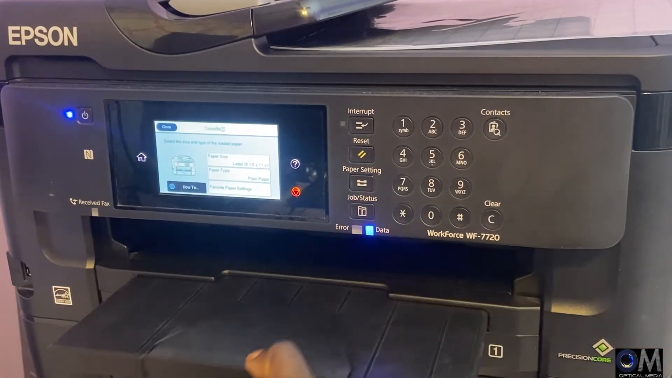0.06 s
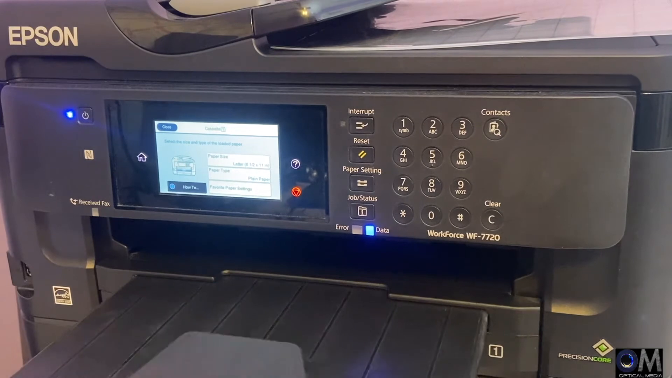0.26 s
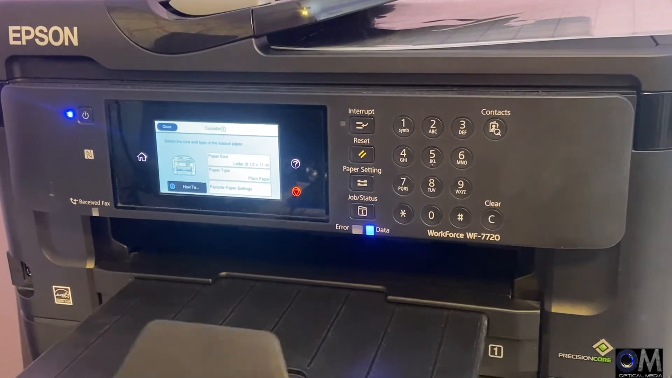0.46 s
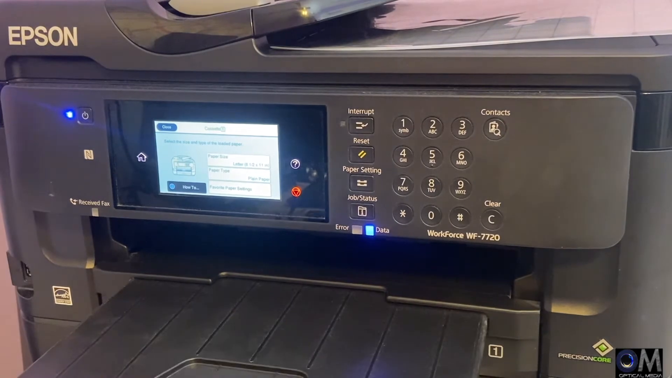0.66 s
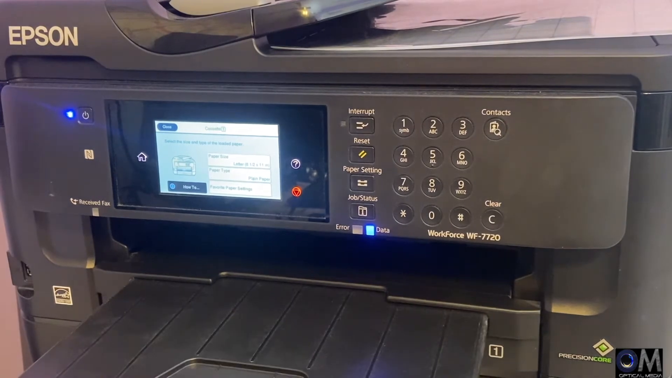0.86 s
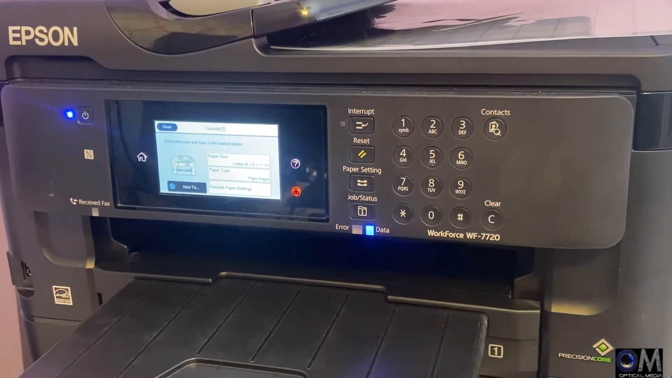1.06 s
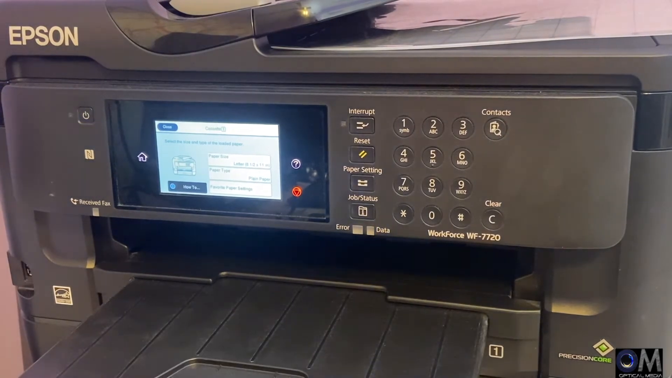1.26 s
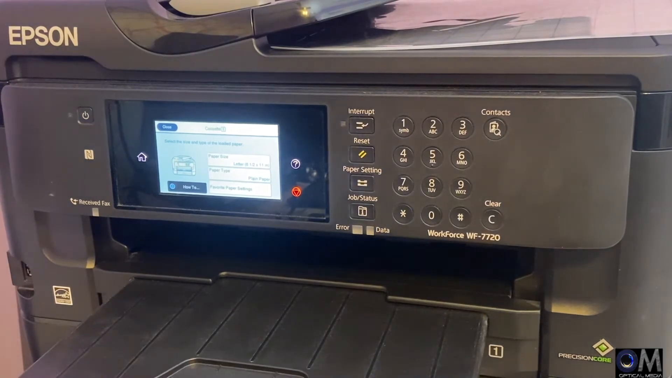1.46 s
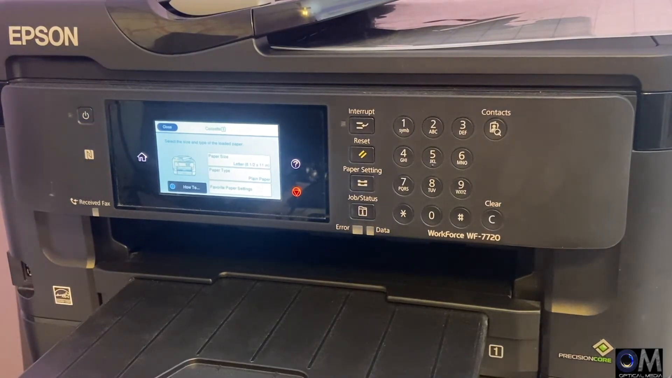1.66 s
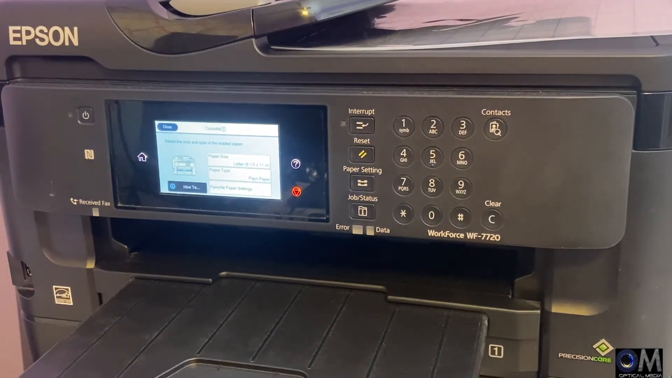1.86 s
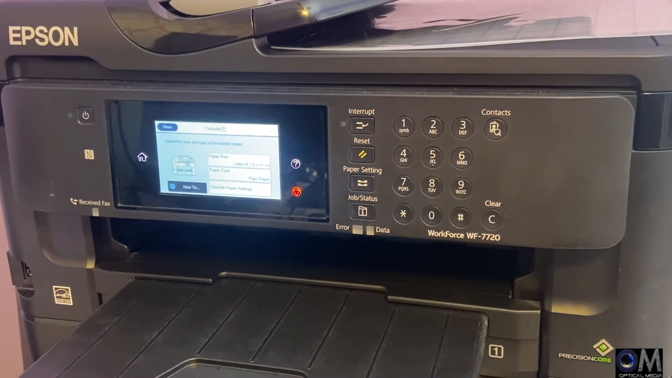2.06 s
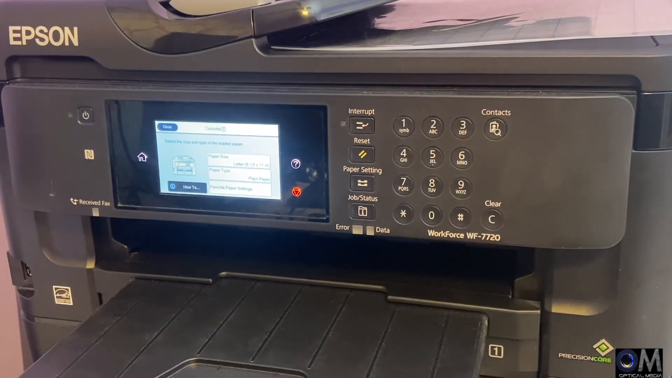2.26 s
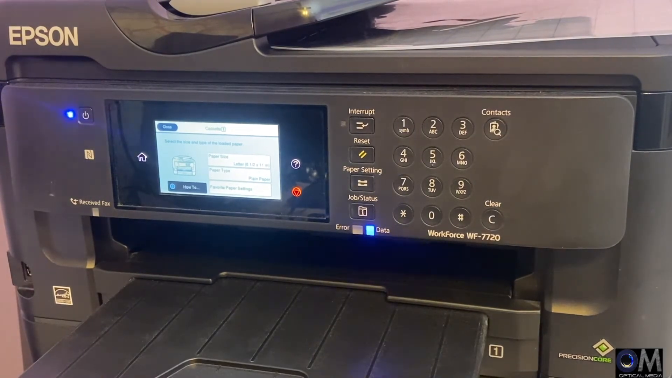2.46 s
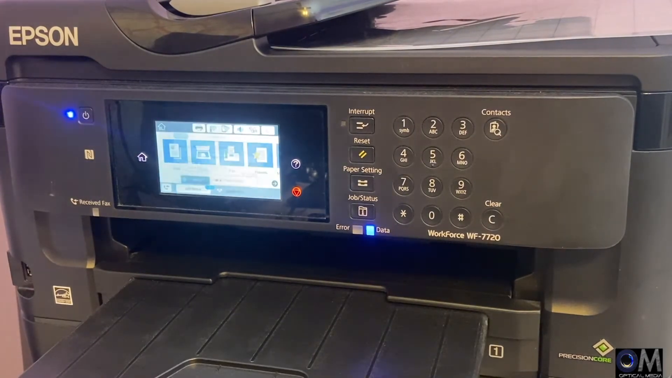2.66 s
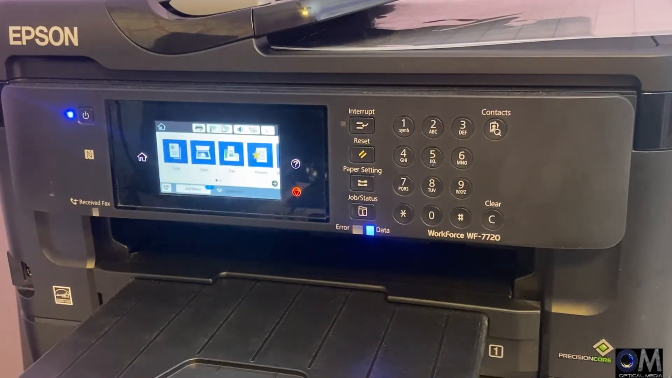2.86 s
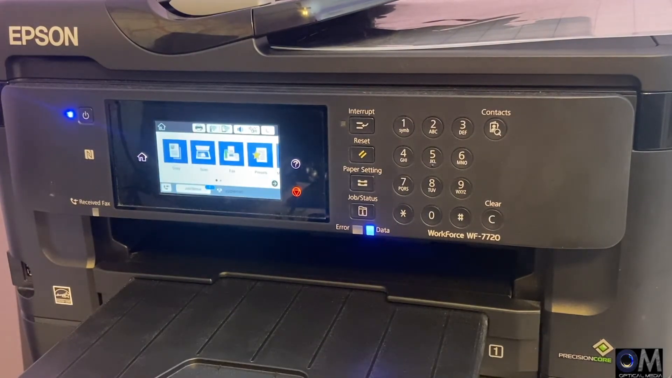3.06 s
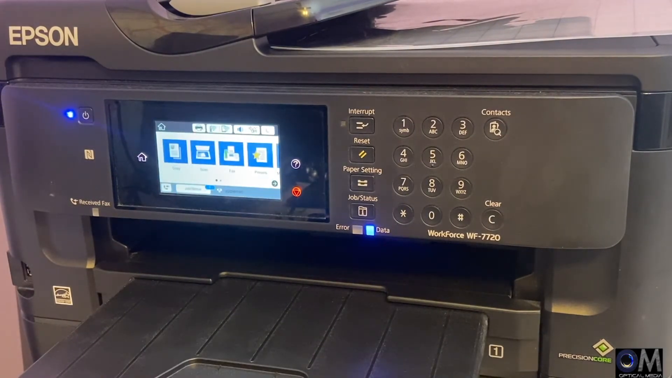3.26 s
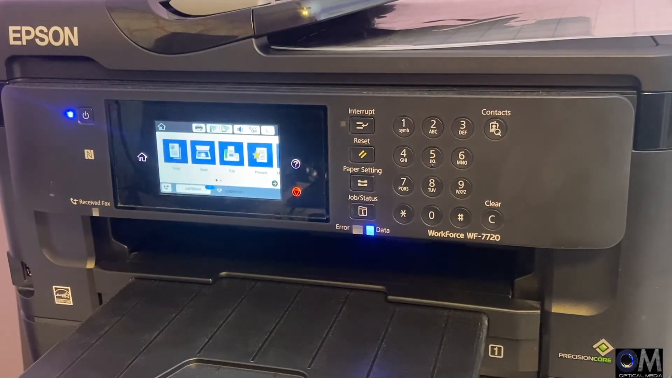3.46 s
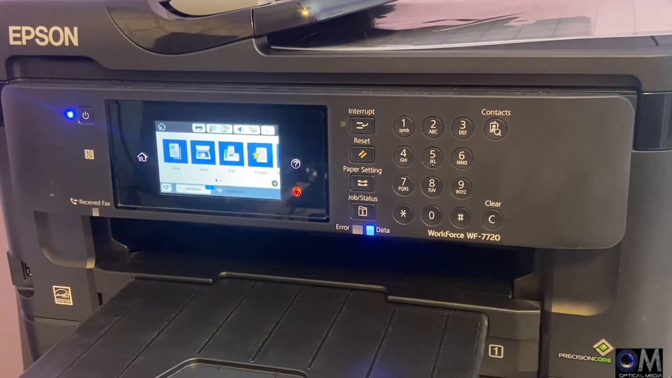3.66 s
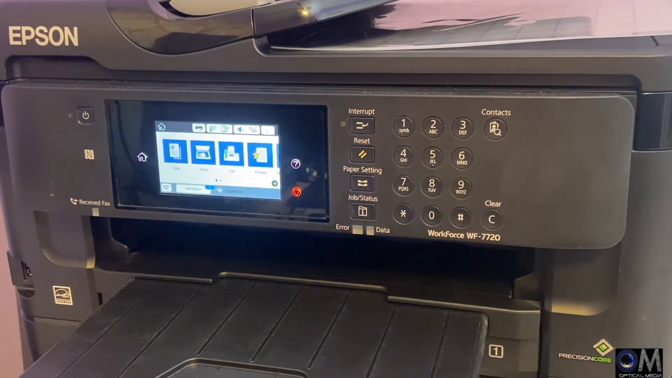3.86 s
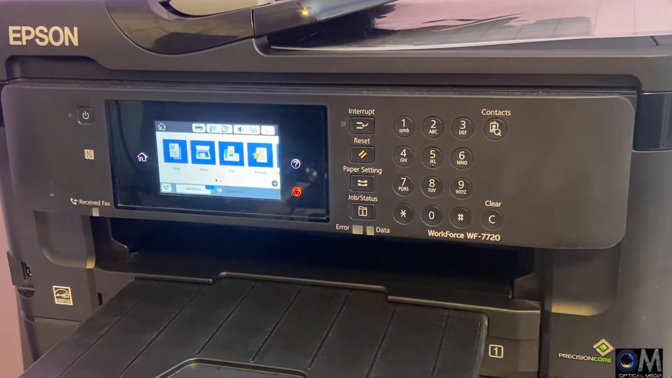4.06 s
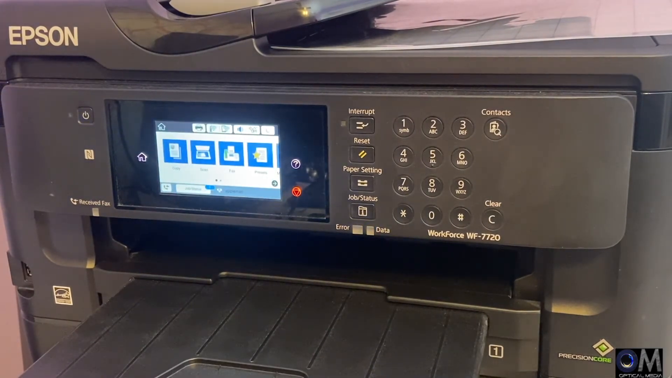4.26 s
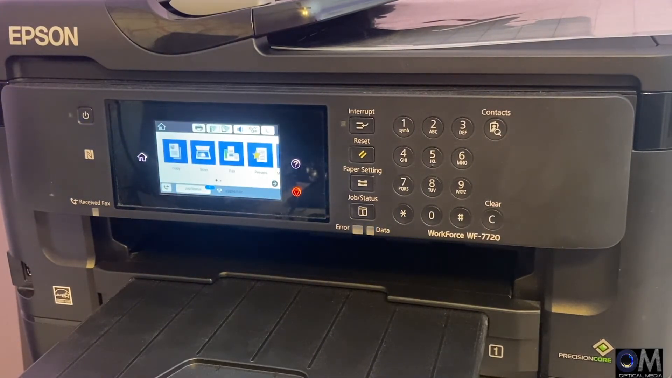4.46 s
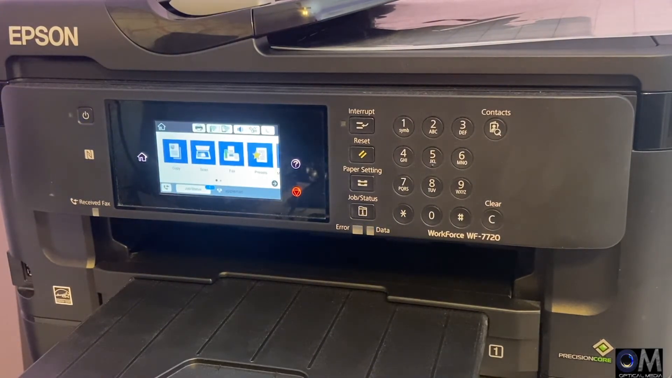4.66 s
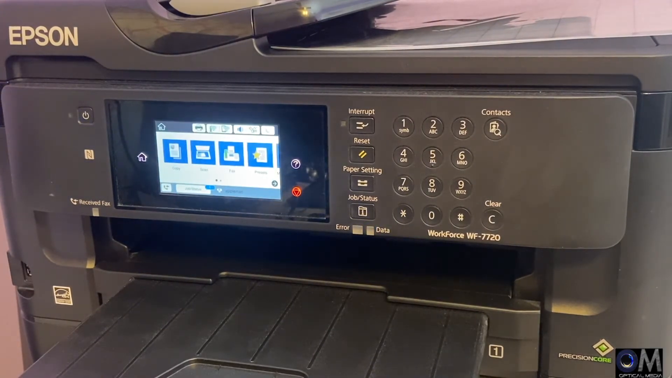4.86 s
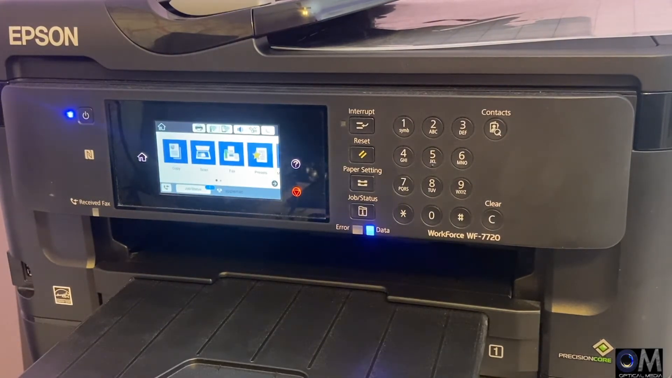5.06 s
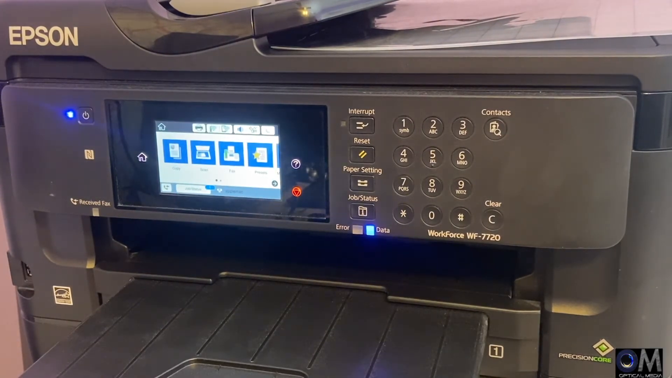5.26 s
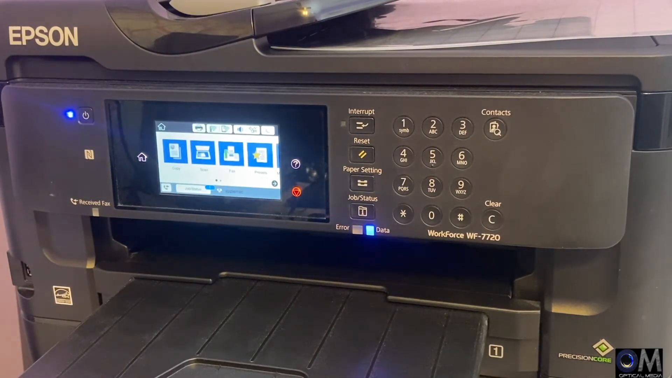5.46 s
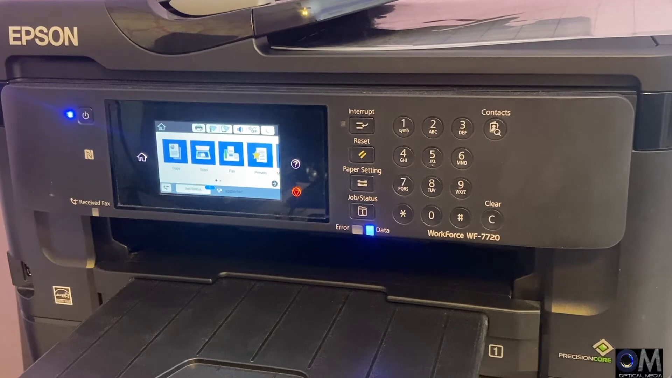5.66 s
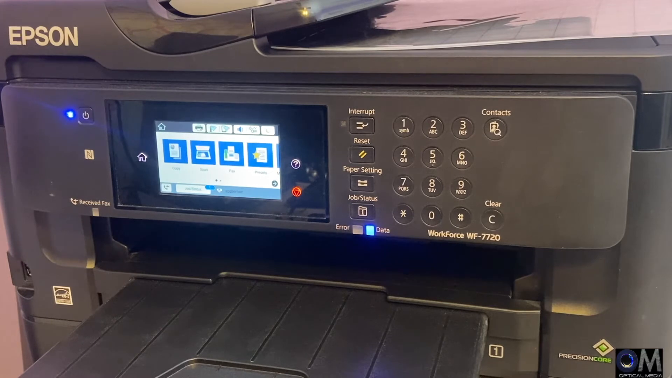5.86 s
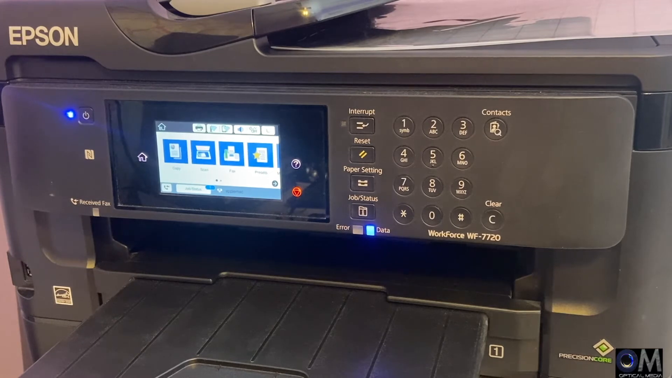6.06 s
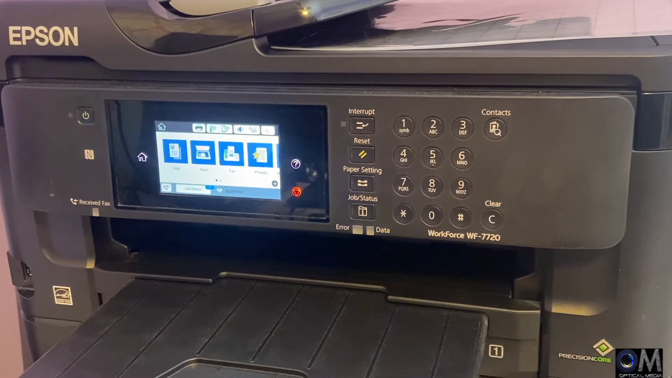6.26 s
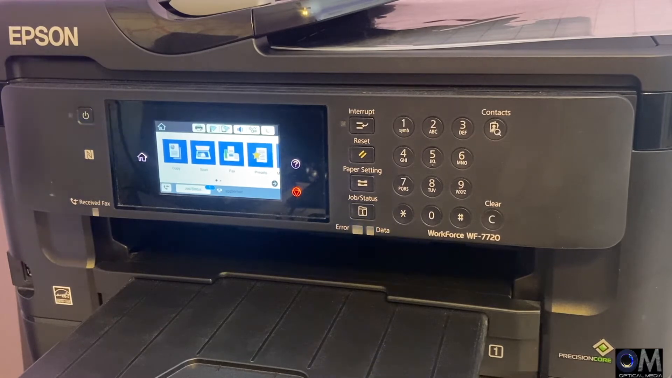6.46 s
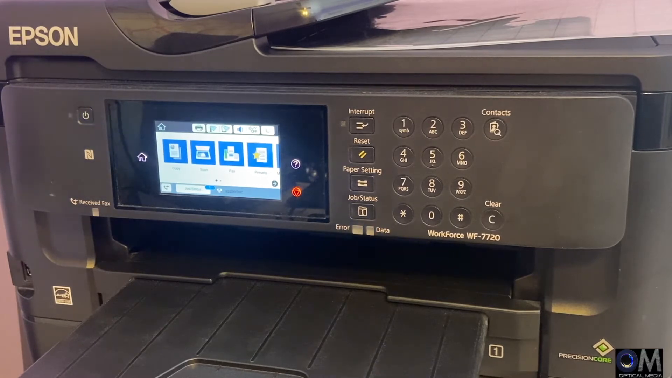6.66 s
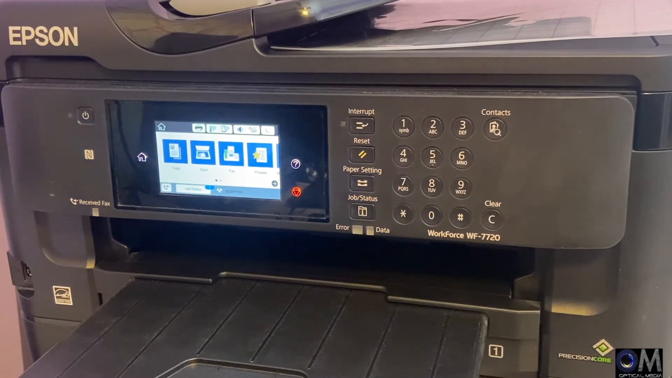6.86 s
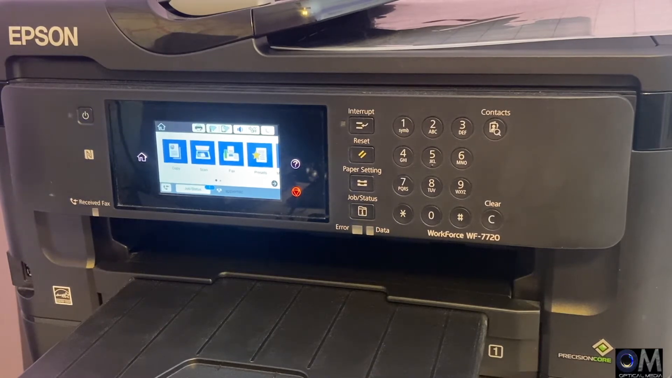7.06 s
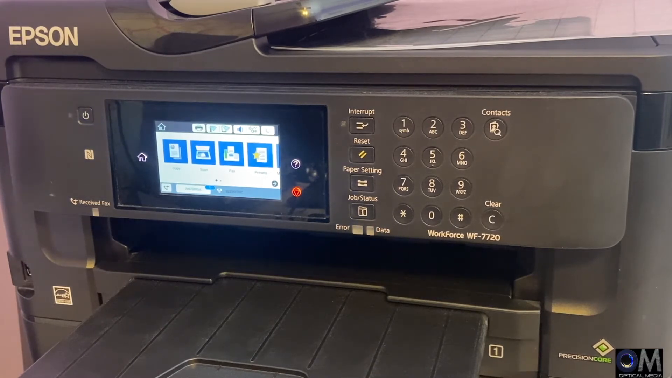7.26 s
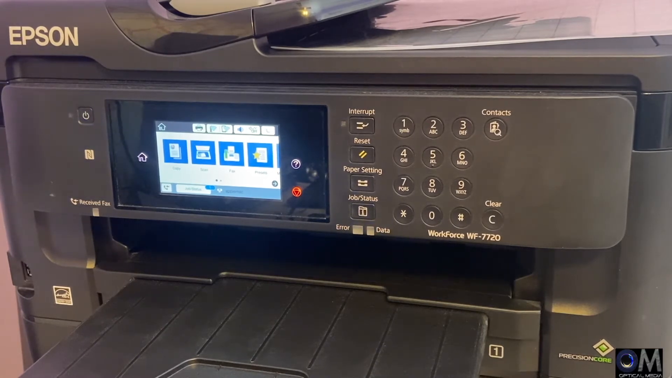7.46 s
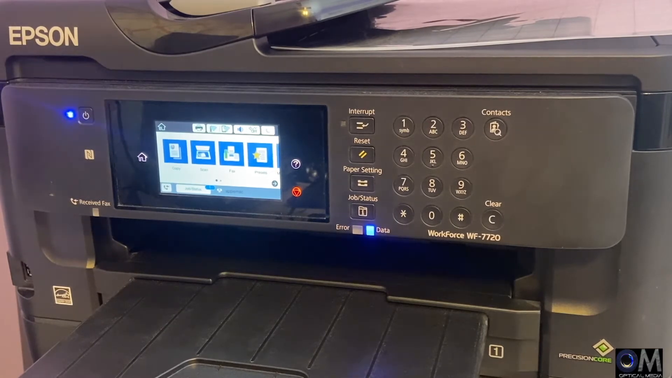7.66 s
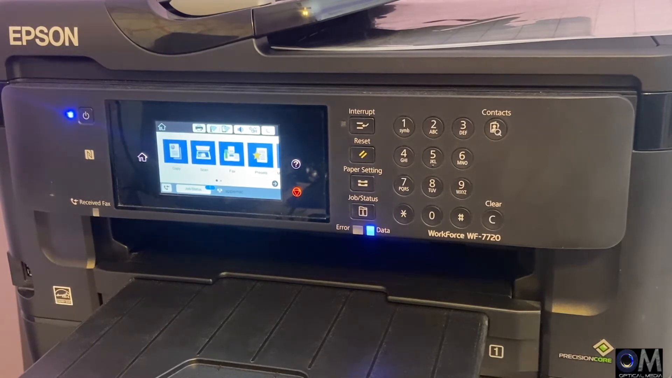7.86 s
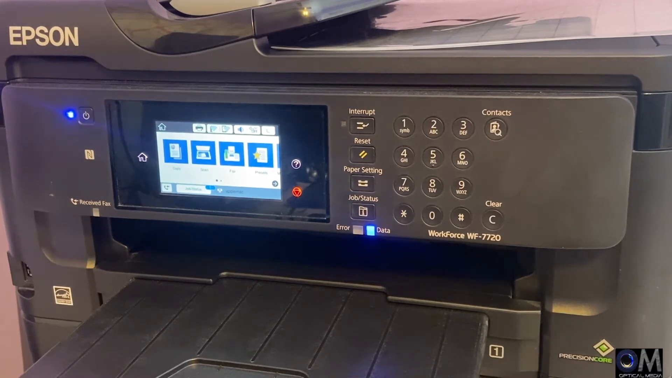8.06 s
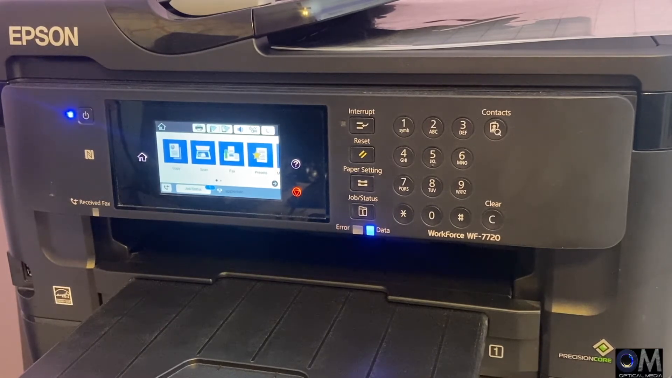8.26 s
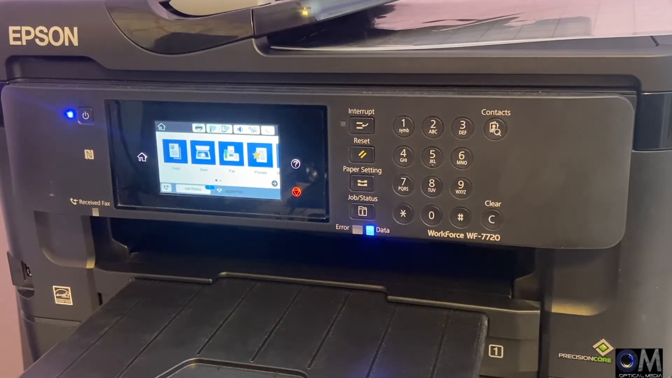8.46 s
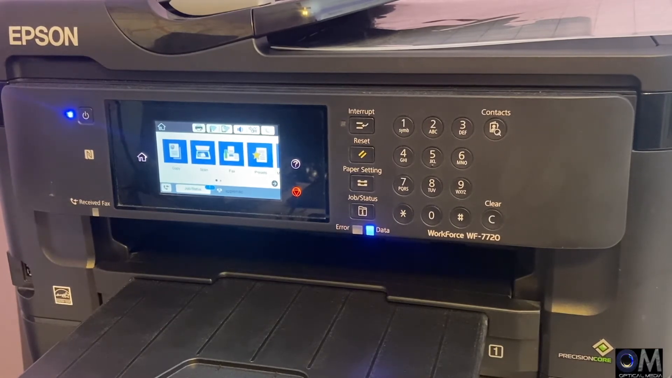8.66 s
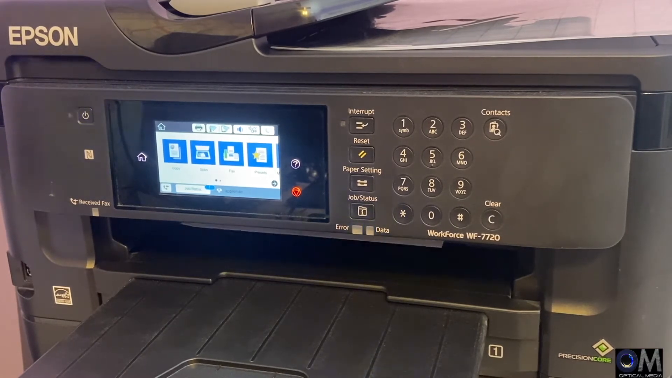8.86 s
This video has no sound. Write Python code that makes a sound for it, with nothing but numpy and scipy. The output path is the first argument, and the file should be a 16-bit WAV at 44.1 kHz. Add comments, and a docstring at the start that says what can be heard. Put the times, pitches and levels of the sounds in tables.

```python
"""In a small room, close to an inkjet printer. A hand slides out the plastic tray, which knocks against its end
stops, and ratchets up the paper stop. Latches click, and hard blows ring the low modes of the case. The drive
whirs through fast runs, its friction noise coloured by the panels, and a sheet is picked up with a sharp clack.
Then the carriage hums across three times a second, and between passes the rollers jerk the paper on with a gear
chirp. A fan, a mains hum and thin electronic whistles sound faintly underneath."""
import sys
import numpy as np
from scipy import signal
from scipy.fft import rfft, irfft, next_fast_len
from scipy.io import wavfile
from scipy.ndimage import uniform_filter1d

SR = 44100
rng = np.random.default_rng(int(sys.argv[2]) if len(sys.argv) > 2 else 0)


def pcm_store(signal):
    """Save signal as 16-bit PCM."""
    levels = np.round(np.clip(np.atleast_2d(signal), -1, 1) * 32767)
    wavfile.write(sys.argv[1], SR, levels.astype(np.int16).T)


N = 393372
T = np.arange(N) / SR

# resonances of the plastic panels: centre_hz, width_hz, lift_db
PANEL_RESONANCES = [(159, 23, 3.5), (182, 9.9, 4), (261.6, 19, 3), (423, 43, 4.5), (491, 41, 3),
                    (640, 31, 2.5), (866, 190, 4), (1007, 78, 4), (1034, 27, 2.5), (1190, 55, 4.5),
                    (1516, 60, 1.5), (1740, 53, 0.5), (2000, 80, 1.5), (2562, 125, 3), (3015, 297, 2.5),
                    (3359, 79, 3), (3830, 345, 1.5), (4740, 70, 4.5), (5900, 172, 1.5), (6299, 339, 2.5)]
# fast runs of the drive: full_speed_s, length_s, spin_up_s, gear_db, slide_db, whine_db, drone_db
DRIVE_RUNS = [(3.028, 0.25, 0.19, -37, -51.5, -44.5, -42), (3.377, 0.45, -0.2, -37, -51.5, -44, -39.5),
              (4.582, 0.48, 0.32, -37.5, -48.5, -44.5, -40), (5.121, 0.043, 0.14, -35.5, -51, -51, -39.5),
              (5.236, 0.073, .06, -36, -49.5, -45.5, -42.5)]
# paper advances: full_speed_s, gear_db, roller_db, paper_db
PAPER_ADVANCES = [(5.682, -50, -39.5, -57), (6.025, -42, -39.5, -52), (6.367, -47, -40.5, -46.5),
                  (6.704, -34, -39.5, -38.5), (7.031, -37.5, -39, -41), (7.363, -35, -38.5, -43.5),
                  (7.702, -40, -37.5, -41), (8.031, -40, -38, -44), (8.369, -38.5, -35, -44.5),
                  (8.695, -36, -40, -43)]
MEAN_GEAR_DB = np.mean([row[1] for row in PAPER_ADVANCES])
SPIN_DOWN_S = 0.047


def amp(db):
    """Decibels to amplitude ratio."""
    return 10 ** (np.asarray(db) / 20)


def rms_one(x):
    """Normalisation to unit rms."""
    return x / np.sqrt(np.mean(x ** 2) + 1e-20)


def at_hz(points, hz):
    """Interpolation on a log-frequency axis."""
    point_hz, value = np.transpose(points)
    return np.interp(np.log(np.maximum(hz, 1)), np.log(point_hz), value)


def drift(per_s):
    """Random modulation of unit spread, interpolated between per_s values a second."""
    knots = rng.standard_normal(8192)
    return np.interp(T * per_s, np.arange(len(knots)), knots) * np.sqrt(3 / 2)


def swell(s, length_s, attack_s, release_s):
    """Exponential rise to 1 at s, hold and decay; attack and release are times for 20 dB, at least 2 ms."""
    before = np.maximum(s - T, 0) / max(attack_s, .002)
    after = np.maximum(T - s - length_s, 0) / max(release_s, .002)
    return amp(-20 * np.minimum(before + after, 10))


def phase_of(hz):
    """Phase as the integral of frequency."""
    return 2 * np.pi * np.cumsum(hz) / SR


def sine(hz):
    """Frequency-modulated sinusoid of unit rms."""
    return np.sqrt(2) * np.sin(phase_of(hz))


def add(track, s, sound):
    """Superposition of a sound on a track, starting at s."""
    start = max(round(s * SR), 0)
    track[start:start + len(sound)] += sound[:N - start]


def lift_db(resonances, hz):
    """Resonance: a plastic part lifts its excitation in bell-shaped peaks."""
    return sum(db / (1 + (2 * (hz - centre) / width) ** 2) for centre, width, db in resonances)


def colour(x, spectrum, panels=True):
    """Source and filter: an excitation takes on a spectrum and, optionally, the panel peaks; unit rms."""
    size = next_fast_len(N)
    grid_hz = np.geomspace(10, SR / 2, num=3000)
    shape_db = at_hz(spectrum, grid_hz) + panels * lift_db(PANEL_RESONANCES, grid_hz)
    gain = np.interp(np.fft.rfftfreq(size, 1 / SR), grid_hz, amp(shape_db))
    return rms_one(irfft(rfft(x, size) * gain, size)[:N])


def friction(spectrum, per_s, grit):
    """Friction noise: smooth rubbing plus tiny random impacts, radiated by the panels."""
    impacts = (rng.random(N) < per_s / SR) * rng.uniform(-1.05, 1, N)
    return colour(rng.standard_normal(N) + grit * rms_one(impacts), spectrum)


def causal(x, gain):
    """Minimum-phase filtering: nothing sounds before the blow."""
    cepstrum = irfft(np.log(gain + 1e-9))
    cepstrum[1:len(x) // 2] *= 2
    cepstrum[len(x) // 2 + 1:] = 0
    return irfft(rfft(x) * np.exp(rfft(cepstrum)))


def struck(modes, t, spread_db):
    """Free vibration: damped modes start in alternate directions, with strengths that vary by blow."""
    return sum((-1) ** k * amp(db + spread_db * rng.normal() - 60 * t / t60) * np.sin(2 * np.pi * hz * t)
               for k, (hz, db, t60) in enumerate(modes))


def background(air_db=-58.5, steady_waver_hz=1.2, fade_s=.04):
    """Line spectra over a noise floor: fan, mains hum, printing hum and electronic whistles above low room
    noise."""
    # steady lines of the fan and of the mains hum: pitch_hz, level_db
    steady_lines = [(188.4, -71.5), (334.3, -62), (576, -76)]
    # a hum while printing, two whistles of the electronics: start_s, length_s, pitch_hz, level_db, waver_hz
    timed_lines = [(5.05, 3.9, 265, -58.5, 4), (0, 1.08, 12656, -78, 2), (2.7, 6.2, 13700, -83, 25)]
    # spectrum of the room noise: frequency_hz, density_db
    air_spectrum = [(15, -49.5), (30, -12), (46, 6.5), (90, -8), (130, 1.5), (200, -9.5), (300, -16),
                    (420, -19), (560, -16.5), (720, -31), (2500, -32.5), (7000, -46), (9500, -48),
                    (16000, -41)]

    def tone(hz, db, waver_hz):
        """A sinusoid with slight random modulation of pitch and level."""
        return amp(db + 1.5 * drift(12)) * sine(hz + waver_hz * drift(40))

    fan = sum(tone(hz, db, steady_waver_hz) for hz, db in steady_lines)
    tones = sum(swell(s, length, fade_s, fade_s) * tone(*line) for s, length, *line in timed_lines)
    mid, side = (colour(rng.standard_normal(N), air_spectrum, panels=False) for _ in range(2))
    return fan + tones + amp(air_db) * (mid + 0.1 * side * np.array([[1], [-1]]))


def murmurs(release_s=0.25):
    """Band-limited noise: a faint rumble at first, then two soft hisses as the printer wakes."""
    # noise bands: start_s, length_s, attack_s, centre_hz, width_hz, level_db
    bands = [(0, 1.08, .03, 160, 110, -54), (2.27, .08, .06, 3650, 600, -69),
             (2.3, 2.1, .35, 7100, 800, -84.5)]
    out = 0
    for s, length, attack_s, hz, width, db in bands:
        band = signal.butter(2, [max(hz - width / 2, 20), hz + width / 2], "band", fs=SR, output="sos")
        noise = rms_one(signal.sosfilt(band, rng.standard_normal(N)))
        out += amp(db) * swell(s, length, attack_s, release_s) * noise
    return out


def plastic_slides(scrape_db=-2.5, hiss_db=-1.5, attack_s=0.037, release_s=0.08):
    """Sliding friction of plastic on plastic: the tray comes out; later something shifts softly inside."""
    # sliding movements: start_s, length_s, scrape_db, hiss_db
    slides = [(-.04, 0.042, -39.5, -54), (0.004, 0.28, -45.5, -46.5), (0.839, 0.015, -57, -57),
              (1.214, 0.078, -67, -68.5), (1.435, 0.094, -47.5, -67.5)]
    # spectra of the low scrape and the bright hiss: frequency_hz, density_db
    scrape_spectrum = [(100, -4.5), (450, 3), (1200, -2.5), (2200, -7.5), (4000, -18), (12000, -40)]
    hiss_spectrum = [(800, -17.5), (2200, -2), (3600, -2.5), (5000, -6.5), (7000, -8), (10000, -11),
                     (16000, -18)]
    scrape, hiss = sum(amp(levels_db)[:, None] * swell(s, length, attack_s, release_s)
                       for s, length, *levels_db in slides)
    return (amp(scrape_db) * scrape * friction(scrape_spectrum, per_s=350, grit=0.35)
            + amp(hiss_db) * hiss * friction(hiss_spectrum, per_s=530, grit=0.71))


def knocks(contacts, resonances, part_db, crack_t60, ring_db, low_cut_hz, hard_rise_s=.0029, size=16384):
    """Impact on dense modes: a short crack and a ring of noise. part_db weights clack, body and tick."""
    # spectra of the clack, hollow body and bright tick of a knock: frequency_hz, density_db
    clack_spectrum = [(500, -19.5), (1300, 2), (1800, -0.5), (2500, 1.5), (3600, -3), (5000, -9.5),
                      (7000, -16.5), (12000, -39)]
    body_spectrum = [(50, -20.5), (130, -0.5), (300, -3.5), (600, 0.5), (1100, -3.5), (1500, -10),
                     (2200, -15.5), (5000, -45)]
    tick_spectrum = [(2500, -20.5), (5000, 0), (7000, -2.5), (8500, -1), (11500, -4), (14000, -6),
                     (16000, -15)]
    out, t, hz = np.zeros(N), T[:size], np.fft.rfftfreq(size, 1 / SR)
    bass_loss = hz ** 2 / np.sqrt(hz ** 4 + low_cut_hz ** 4) + .001
    parts = np.array([rms_one(bass_loss * amp(at_hz(spectrum, hz) + lift_db(resonances, hz)))
                      for spectrum in (clack_spectrum, body_spectrum, tick_spectrum)])
    for s, clack_db, body_db, tick_db, ring_t60 in contacts:
        slowness = 1 + .7 * np.clip((body_db - clack_db) / 10, 0, 1)   # hollow blows are slower
        rise_s = hard_rise_s * slowness
        onset = amp(-30 * np.maximum(1 - t / (2 * rise_s), 0))
        since_peak = np.maximum(t - 2 * rise_s, 0)
        crack = amp(-60 * since_peak / (crack_t60 * slowness))
        ring = amp(ring_db - 60 * since_peak / ring_t60)
        weights = amp(np.add([clack_db, body_db, tick_db], part_db))
        gain = np.sqrt(weights ** 2 @ parts ** 2)   # the parts add in power
        add(out, s - rise_s, causal(rng.standard_normal(size) * onset * (crack + ring) / 2, gain))
    return out


def tray_knocks():
    """Impact excitation: the tray hits its end stops and rings at its own resonances."""
    # blows on the end stops: time_s, clack_db, body_db, tick_db, ring_t60_s
    contacts = [(0.2363, -17.5, -38, -31.5, .08), (.2441, -9, -28.5, -23.5, 0.041),
                (.2516, -9.5, -19.5, -32, 0.075), (0.2612, -15, -21, -28.5, 0.068),
                (0.6019, -15.5, -22.5, -47, 0.083), (0.6169, -14, -22.5, -45, .06),
                (.6605, -22.5, -26, -54, 0.04), (0.6762, -19, -31, -38, 0.063)]
    # resonances of the tray: centre_hz, width_hz, lift_db
    resonances = [(167, 53, 4.5), (535, 52, 4), (870, 50, 7.5), (971, 70, 5.5), (1200, 58, 8.5),
                  (1545, 48, 6), (2000, 71, 1), (3000, 170, 5), (3460, 220, 5), (4139, 110, 7),
                  (4720, 140, 7), (5100, 250, 7.5), (6770, 237, 5)]
    return knocks(contacts, resonances, part_db=(-5, 1, 5), crack_t60=.044, ring_db=-8, low_cut_hz=190)


def case_boom(jolt_db=-40, turn_delay_s=0.036, jolt_cutoff_hz=320, rise_s=0.0028, size=30000):
    """Modal ringing: hard blows and each turn of the carriage excite the low modes of the case."""
    # blows that shake the case: time_s, level_db, cutoff_hz
    thumps = [(.255, -29.5, 498), (.62, -47, 300), (1.076, -24.5, 151), (2.71, -44, 407),
              (2.91, -39.5, 298), (4.085, -39, 330), (4.19, -47.5, 298), (4.29, -39, 198), (4.528, -23, 95),
              (5.3, -34.5, 170)]
    # low modes of the case: pitch_hz, level_db, t60_s
    case_modes = [(62, -15, 0.63), (120, -14.5, 0.075), (128.5, 0.5, 0.38), (158.2, -8, 0.063),
                  (190.2, -7, 0.2), (251, -6.5, 0.28), (280.2, -10.5, 0.19), (413, -9, 0.54)]
    out, t = np.zeros(N), T[:size]
    jolts = [(s + turn_delay_s, jolt_db + .3 * (gear_db - MEAN_GEAR_DB), jolt_cutoff_hz)
             for s, gear_db, *_ in PAPER_ADVANCES]   # a harder advance jolts more
    for s, db, cutoff_hz in list(thumps) + jolts:
        # a soft contact barely excites the modes above its cutoff
        modes = [(hz, level - 10 * np.log10(1 + (hz / cutoff_hz) ** 4), t60)
                 for hz, level, t60 in case_modes]
        add(out, s, amp(db) * struck(modes, t, spread_db=2) * (1 - np.exp(-t / rise_s)))
    return out


def paper_stop(ring_db=-9.5, snap_db=-8.0, snap_t60=0.051, size=12000):
    """Ratchet impacts: the flap snaps over its catches, and its modes rise in pitch as it stands up."""
    # ticks over the catches: time_s, level_db, pitch_hz
    ticks = [(.347, -19, 2960), (.364, -20.5, 3130), (.385, -26.5, 3100), (.464, -24.5, 3330),
             (.477, -29, 3400), (.492, -29.5, 3430), (0.503, -29.5, 3450), (0.512, -27.5, 3450)]
    # modes of the flap: pitch_ratio, level_db, t60_s
    flap_modes = [(.28, -13.5, .05), (.45, -16, .04), (.9, -5, .03), (1, -0.5, .035), (1.08, -6, .025),
                  (1.28, -5, .02), (1.4, -6, .015)]
    # spectrum of the snap: frequency_hz, density_db
    snap_spectrum = [(150, -6), (800, 4), (2200, -3), (3000, 0), (3600, 5.5), (4400, 1.5), (5300, -9.5),
                     (7000, -8), (9000, -11), (16000, -28.5)]
    out, t, hz = np.zeros(N), T[:size], np.fft.rfftfreq(size, 1 / SR)
    snap_gain = rms_one(amp(at_hz(snap_spectrum, hz)))
    for s, db, pitch_hz in ticks:
        snap = causal(rng.standard_normal(size) * amp(-60 * t / snap_t60), snap_gain)
        ring = struck([(ratio * pitch_hz, level, t60) for ratio, level, t60 in flap_modes], t, spread_db=4)
        add(out, s, amp(db) * (amp(ring_db) * ring + amp(snap_db) * snap))
    return out


def latch_knocks():
    """Impact excitation: latches and levers strike and sound through the panel resonances."""
    # blows in the mechanism: time_s, clack_db, body_db, tick_db, ring_t60_s
    contacts = [(0.987, -31.5, -33, -56, 0.35), (1.056, -34.5, -35.5, -55.5, 0.14),
                (1.072, -32, -26, -69, 0.041), (1.4142, -40.5, -45, -59, 0.09),
                (1.8146, -64.5, -54.5, -88, 0.11), (2.4164, -63, -74.5, -65.5, 0.05),
                (2.615, -58, -60.5, -82, .06), (2.6965, -43, -37.5, -53.5, 0.089),
                (2.7059, -35, -28, -46.5, 0.041), (2.7633, -51, -42, -64, 0.14),
                (2.9016, -32, -52, -58, 0.079), (2.9121, -27.5, -42, -46.5, 0.15),
                (2.9759, -27, -44, -64, 0.72), (4.0135, -52, -41.5, -67.5, 0.44),
                (4.075, -53, -41.5, -68, 0.13), (4.1785, -48.5, -40, -84, .11),
                (4.2812, -57.5, -51, -72, 0.14), (4.369, -49.5, -57, -83, 0.043),
                (4.4498, -36, -38, -51, 0.072), (4.5067, -27, -31, -39.5, 0.11),
                (4.5265, -28, -23, -42, 0.058), (4.5328, -9.5, -16.5, -44, 0.031),
                (4.7777, -18.5, -32, -41, 0.39), (4.864, -21, -30.5, -51, 0.31),
                (4.9884, -26, -54, -40.5, .11), (5.029, -23.5, -55, -59, 0.041),
                (5.108, -28, -47, -46, .06), (5.0782, -20.5, -27, -47, 0.089),
                (5.1322, -23.5, -37, -64, 0.25), (5.2008, -27.5, -41, -58, 0.33),
                (6.0247, -30.5, -37, -30.5, 0.018)]
    return knocks(contacts, PANEL_RESONANCES, part_db=(-5.5, .5, 5),
                  crack_t60=0.053, ring_db=-6, low_cut_hz=33)


def slow_turn(peak_s=1.505, half_length_s=0.048, level_db=-52, top_hz=1230, sweep_s=0.078):
    """Gear pitch is proportional to speed: the whine climbs and falls in one slow turn of the rollers."""
    speed = .3 + .7 * np.exp(-((T - peak_s) / sweep_s) ** 2)
    level = amp(level_db + 3 * drift(70)) / (1 + ((T - peak_s) / half_length_s) ** 6)
    return level * sine(top_hz * speed * (1 + .03 * drift(500)))


def fast_runs(hiss_db=5.0, rattle_hz=69, brake_db=1.5, brake_s=0.062, coast_db=-11, coast_s=0.18):
    """Friction follows motion: gears rattle and the rail hisses as the drive spins up, brakes and coasts."""
    # moments when the gears catch, one for each run: time_s
    catches = [2.91, 3.31, 4.455, 5.05, 5.2]
    # spectra of the gears and of the carriage sliding on its rail: frequency_hz, density_db
    gear_spectrum = [(40, -10), (90, -4), (180, .5), (400, 2), (700, -2), (1100, -3), (1600, -3.5),
                     (2200, -10.5), (3500, -16), (8000, -21)]
    rail_spectrum = [(600, 0), (1800, 5), (3200, 5), (4300, 1), (6500, -3), (8500, -3), (11500, -0.5),
                     (14000, -13), (16000, -36)]
    gears, hiss = 0, 0
    for catch_s, (s, length, spin_up_s, gear_db, slide_db, _, _) in zip(catches, DRIVE_RUNS):
        engaged = swell(catch_s, N / SR, .01, 1)
        # braking loads the gears just before a long run stops
        load_db = brake_db * np.exp(-((T - s - length + brake_s / 2) / brake_s) ** 2)
        load_db *= length > 2 * brake_s
        coast = amp(coast_db) * swell(s, length, spin_up_s / 2, coast_s)
        spinning = np.maximum(swell(s, length, spin_up_s, SPIN_DOWN_S), coast)
        sliding = np.maximum(swell(s, length, .57 * spin_up_s, release_s=.043), coast)
        gears = np.maximum(gears, engaged * amp(gear_db + load_db) * spinning)
        hiss = np.maximum(hiss, engaged * amp(slide_db + load_db) * sliding)
    rattle_db = 1.1 * np.sin(phase_of(rattle_hz * (1 + .1 * drift(30)))) + .9 * drift(45)
    return (amp(rattle_db) * gears * friction(gear_spectrum, per_s=500, grit=0.69)
            + amp(hiss_db) * hiss * friction(rail_spectrum, per_s=670, grit=0.41))


def motor_tones(drone_db=-3.0, whine_db=-0.5, drone_hz=129.0, whine_hz=1609, drone_lag_s=0.035):
    """Forced vibration: at full speed the motor holds one pitch; the case drones at its strongest mode."""
    drone, whine = 0, 0
    for s, length, *_, motor_db, case_db in DRIVE_RUNS:
        full_speed = swell(s + .014, length - .014, attack_s=.028, release_s=.014)
        shaking = swell(s + drone_lag_s, length, attack_s=.25, release_s=.3)   # slow to start and stop
        whine = np.maximum(whine, amp(motor_db) * full_speed)
        drone = np.maximum(drone, amp(case_db) * shaking)
    drone *= sine(drone_hz * (1 + 0.01793 * drift(24.94)))
    whine *= sine(whine_hz * (1 + 0.0018 * drift(130)))
    return amp(drone_db + 1.9 * drift(25)) * drone + amp(whine_db + 2.0 * drift(60)) * whine


def carriage_passes(start_s=5.38, motor_hz=845, buzz_hz=797, hunt_hz=14, turn_delay_s=0.0324,
                    whine_db=-54.5, buzz_db=-66, hiss_db=-56.5, rumble_db=-58):
    """Speed hunting modulates the motor's pitch and level over a steadier buzz; both sag at the turns."""
    # overtones of the carriage drive: harmonic_number, level_db
    overtones = [(2, 8), (3, 4.5), (4, 6), (5, 2.5), (6, -16), (7, -16)]
    # spectra of the hiss and rumble of the carriage: frequency_hz, density_db
    hiss_spectrum = [(200, 10.5), (500, 0), (1000, 5), (2000, -3), (3200, -6), (5000, -15), (8000, -8),
                     (12000, -12), (16000, -5)]
    rumble_spectrum = [(30, -21), (55, 0), (90, 4.5), (130, 12.5), (200, -21), (400, -17), (600, -11),
                       (1500, -20)]
    turns_s = np.array([row[0] for row in PAPER_ADVANCES]) + turn_delay_s
    reversing = np.clip(sum(np.exp(-((T - s) / 0.077) ** 4) for s in turns_s), 0, 1)
    speed = 1 - .03 * sum(np.exp(-((T - s) / 0.11) ** 2) for s in turns_s)
    since_turn = T - np.r_[start_s, turns_s][np.searchsorted(turns_s, T)]
    hunt_phase = 2 * np.pi * hunt_hz * since_turn + .8 * drift(10)   # restarts at each turn
    hunting = .032 * np.sin(hunt_phase) + .036 * drift(250)   # slow swing and fast jitter
    throb = 1 + .6 * np.cos(hunt_phase)
    warble = throb * sine(motor_hz * speed * (1 + hunting))
    buzz_phase = phase_of(buzz_hz * speed * (1 + .016 * drift(150) + .005 * drift(5)))
    buzz = rms_one(sum(amp(db + 3 * drift(30)) * np.sin(round(k) * buzz_phase) for k, db in overtones))
    tones = (1 - reversing) * (amp(whine_db + 2.5 * drift(18)) * warble + amp(buzz_db) * buzz)
    hiss = amp(hiss_db - 8.4 * reversing) * friction(hiss_spectrum, per_s=990, grit=0.62)
    rumble = amp(rumble_db + 8.1 * drift(7)) * colour(rng.standard_normal(N), rumble_spectrum)
    return (tones + hiss + rumble) * swell(start_s, N / SR, .035, SPIN_DOWN_S)


def paper_feed(top_hz=1230, sweep_s=0.015, whine_s=0.02, grip_s=0.025, stroke_s=0.017,
               scrape_db=-1.0, coast_db=-43.0, coast_delay_s=0.025, coast_s=0.048):
    """Gear pitch follows roller speed: a chirp in a puff of paper friction, then a grumble to rest."""
    # spectra of the rollers, the paper and the coasting gears: frequency_hz, density_db
    roller_spectrum = [(100, -3), (400, 7.5), (750, 9), (1200, 8.5), (2000, 3.5), (3500, -1), (5000, -10.5),
                       (8000, -12.5)]
    paper_spectrum = [(2000, -35), (3800, -4), (5000, -9), (6500, -2), (8500, -3.5), (11500, -2.5),
                      (14000, -17), (16000, -49)]
    coast_spectrum = [(50, -0.5), (150, -1.5), (300, -3), (500, -8.5), (800, -16), (2000, -21.5),
                      (6000, -34)]
    whine, scrape, hiss, coast, speed = np.zeros((5, N))
    for s, gear_db, roller_db, paper_db in PAPER_ADVANCES:
        near = abs(T - s) < .15
        t = T[near] - s
        speed[near] = .6 + .4 * np.exp(-((t - .003) / sweep_s) ** 2)
        whine[near] = amp(gear_db) * np.exp(-(t / whine_s) ** 2)
        scrape[near] = amp(roller_db) / (1 + ((t + .00059) / grip_s) ** 6)
        hiss[near] = amp(paper_db) / (1 + (t / stroke_s) ** 4)
        coast[near] = np.exp(-((t - coast_delay_s) / coast_s) ** 2)
    whine *= sine(top_hz * speed * (1 + 0.0298 * drift(600)))
    scrape *= amp(scrape_db + 1.8 * drift(180)) * friction(roller_spectrum, per_s=1100, grit=0.83)
    hiss *= friction(paper_spectrum, per_s=310, grit=0.56)
    coast *= amp(coast_db) * friction(coast_spectrum, per_s=200, grit=0.38)
    return whine + scrape + hiss + coast


def braking_groan(groan_db=-42, start_hz=420, end_hz=112, fall_s=0.024, delay_s=0.067):
    """Deceleration: the feed motor glides down in pitch after each advance, louder after a harder one."""
    out = np.zeros(N)
    for s, gear_db, *_ in PAPER_ADVANCES:
        near = (T > s - .05) & (T < s + .3)
        hz = end_hz + (start_hz - end_hz) * np.exp(-np.maximum(T[near] - s, 0) / fall_s)
        envelope = swell(s + delay_s, length_s=.0059, attack_s=.066, release_s=.067)[near]
        level = amp(groan_db + .3 * (gear_db - MEAN_GEAR_DB))
        out[near] += level * envelope * np.sqrt(2) * np.sin(phase_of(hz) + 2 * np.pi * rng.random())
    return out * amp(2.0 * drift(70))


def evened(response, share=.7, fine_hz=30, broad_hz=450):
    """Spectral smoothing: chance peaks and dips shrink, so the room adds little pitch of its own."""
    power = np.mean(abs(rfft(response)) ** 2, axis=0)
    fine, broad = (uniform_filter1d(power, max(int(width * response.shape[1] / SR), 1))
                   for width in (fine_hz, broad_hz))
    return np.array([causal(channel, (broad / fine) ** (share / 2)) for channel in response])


def room(x, wet_db, gap_s=0.0041, absorb_db_per_octave=3.5, size=26000):
    """Diffuse reverberation: reflections die faster in the treble; the ears differ in the middle range."""
    # likeness of the reverberation at the two ears: frequency_hz, coherence (0 to 1)
    ear_coherence = [(60, 1), (150, 0.6), (300, 0.4), (700, 0), (1400, 0), (2200, .88), (3200, 1),
                     (6000, 1), (16000, 1)]
    # decay of the room: frequency_hz, t60_s
    decay_times = [(100, 0.22), (300, 0.55), (800, 0.2), (2000, 0.22), (5000, 0.24), (15000, 0.079)]
    t, hz = T[:size], np.fft.rfftfreq(size, 1 / SR)
    noise, tail = rfft(rng.standard_normal((2, size))), 0
    edges_hz = [0, *np.geomspace(120, SR / 2, num=14)]
    for low, high in zip(edges_hz, edges_hz[1:]):
        centre_hz = (low + high) / 2
        mid, side = irfft(noise * ((hz >= low) & (hz < high)))
        alike = np.clip(at_hz(ear_coherence, centre_hz), 0, 1)
        ears = np.sqrt((1 + alike) / 2) * mid + np.sqrt((1 - alike) / 2) * side * np.array([[1], [-1]])
        decay = amp(-60 * t / at_hz(decay_times, centre_hz)) * (t > gap_s)
        treble_octaves = np.clip(np.log2(centre_hz / 1000), 0, 2)
        reflected = amp(-absorb_db_per_octave * treble_octaves)   # soft surfaces swallow treble
        tail += reflected * decay / np.linalg.norm(decay) * ears
    response = evened((t == 0) + amp(wet_db) * tail)
    return signal.fftconvolve(x[None], response, axes=1)[:, :N]


def scene():
    """Superposition of direct and reverberant sound; the case's boom and tones sit a little to the right."""
    tray = tray_knocks() + paper_stop()
    latches = latch_knocks()
    works = fast_runs() + carriage_passes() + plastic_slides() + slow_turn()
    case = (case_boom() + motor_tones() + braking_groan()) * amp([[-1.5], [1.0]])
    impacts = room(tray, wet_db=-0.5) + room(latches, wet_db=-0.5)
    motion = room(paper_feed(), wet_db=-3.0) + amp(-1.0) * room(works, wet_db=-2.0)
    return impacts + motion + case + murmurs() + background()


def record(dry, split_hz=6830, lag_s=0.00023, low_cut_hz=36, high_cut_hz=15900):
    """Group delay parts the two microphone channels in the high treble; deep bass and the top are cut."""
    size = next_fast_len(N + SR // 10)
    hz = np.fft.rfftfreq(size, 1 / SR)
    phase_slip = np.pi * lag_s * np.maximum(hz - split_hz, 0) * np.array([[-1], [1]])
    high_passed = signal.sosfilt(signal.butter(4, low_cut_hz, "high", fs=SR, output="sos"), dry)
    low_pass = 1 / np.sqrt(1 + (hz / high_cut_hz) ** 200)
    return irfft(rfft(high_passed, size) * np.exp(1j * phase_slip) * low_pass, size)[:, :N]


dry = scene()
out = record(dry)
pcm_store(out)
```